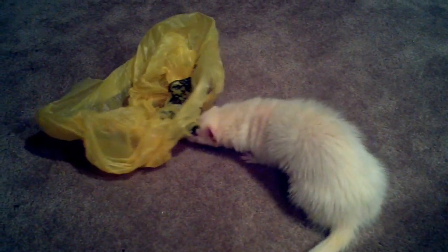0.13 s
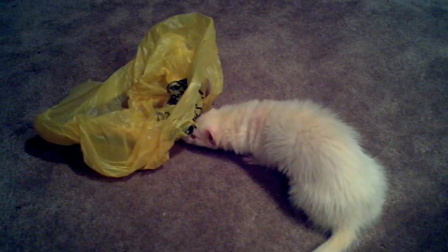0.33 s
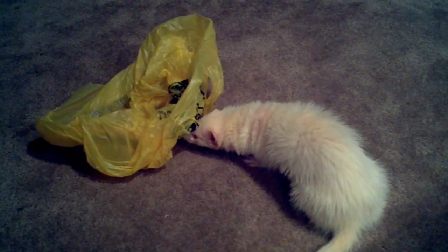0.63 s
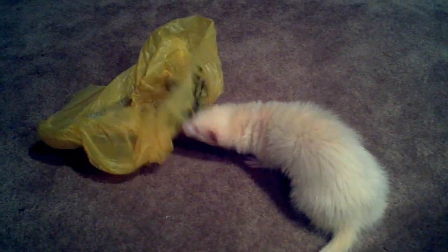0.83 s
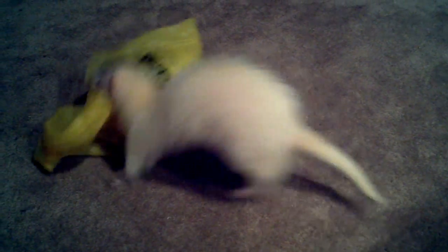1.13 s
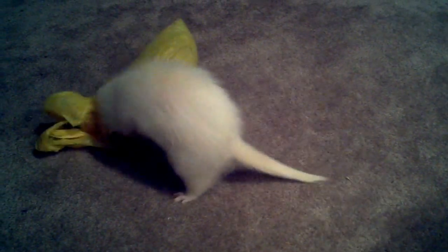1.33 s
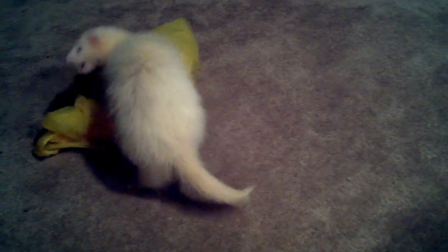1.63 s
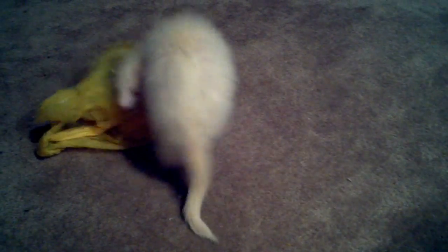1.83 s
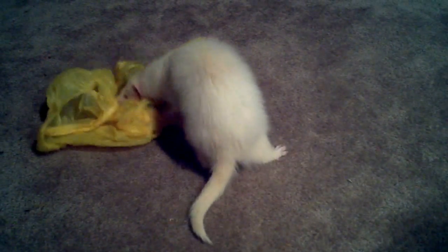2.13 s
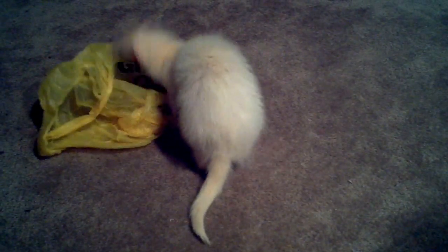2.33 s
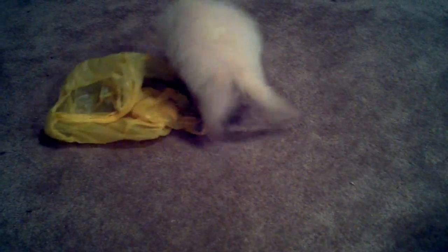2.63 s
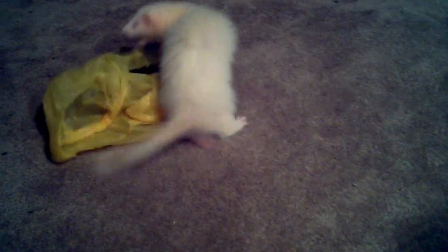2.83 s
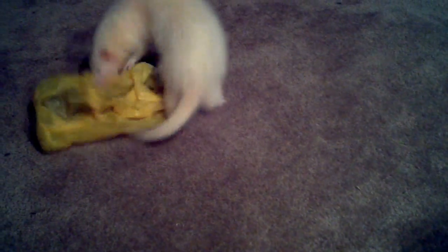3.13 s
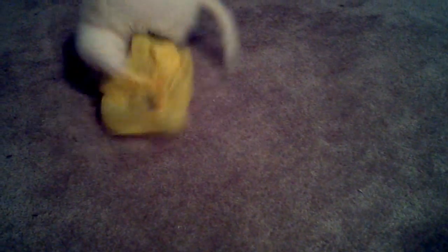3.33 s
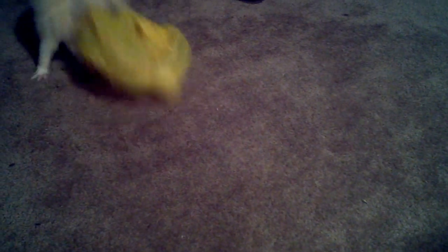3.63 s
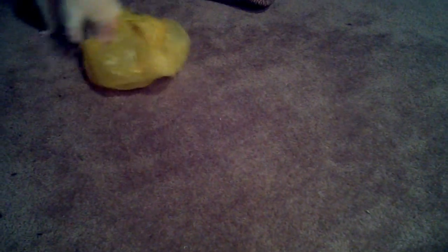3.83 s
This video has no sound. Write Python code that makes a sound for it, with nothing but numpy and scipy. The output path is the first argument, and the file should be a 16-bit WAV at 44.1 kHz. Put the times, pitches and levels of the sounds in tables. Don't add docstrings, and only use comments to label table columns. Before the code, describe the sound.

A thin plastic bag crackles and rustles in growing bursts as a small animal drags it

```python
import sys
import numpy as np
from scipy import signal
from scipy.fft import rfft, irfft, next_fast_len
from scipy.io import wavfile
from scipy.ndimage import map_coordinates

SR = 44100
rng = np.random.default_rng(int(sys.argv[2]) if len(sys.argv) > 2 else 0)


def gain_from_db(level_db):
    decades = np.asarray(level_db, float) / 20
    return 10 ** decades


def wav_out(sig):
    wavfile.write(sys.argv[1], SR, np.round(np.clip(np.atleast_2d(sig).T, -1, 1) * 32767).astype(np.int16))


N = 176400

# peak t/s, peak level/dB, rise/s, fall/s (to half power)
CRUMPLE_SURGES = [(.027, -57.5, 0.057, 0.076), (.197, -57.5, 0.038, 0.054), (.333, -60, 0.023, 0.031),
                  (.43, -66.5, 0.062, 0.035), (1.015, -54.5, 0.026, 0.04), (1.084, -45.5, 0.023, 0.037),
                  (1.21, -49.5, 0.027, .03), (1.275, -48.5, 0.042, .03), (1.34, -44, 0.039, 0.065),
                  (1.43, -44, 0.039, 0.09), (1.605, -41.5, 0.063, 0.076), (1.757, -44, 0.022, 0.082),
                  (2.05, -40.5, 0.042, 0.037), (2.14, -45, 0.023, 0.02), (2.266, -44.5, 0.057, 0.046),
                  (2.37, -45, 0.041, 0.019), (2.481, -49.5, 0.053, 0.051), (2.585, -45, 0.022, 0.043),
                  (2.768, -38.5, 0.045, 0.025), (2.873, -43.5, 0.055, 0.041), (2.999, -36, 0.036, 0.054),
                  (3.1, -44.5, .03, 0.15), (3.305, -39.5, 0.038, .04), (3.375, -38, 0.04, 0.045),
                  (3.522, -33, 0.054, .03), (3.59, -35, 0.024, 0.037), (3.72, -37, 0.044, 0.038),
                  (3.803, -34.5, 0.043, 0.025), (3.918, -32.5, 0.049, .045)]
# f/Hz, spectral level/dB per Hz
FILM_SPECTRUM = [(150, -22.5), (1000, -43.5), (1900, -23), (2500, -4), (5600, -6.5), (7600, -1.5),
                 (10500, -9), (15500, -8.5)]


def film():
    gain = swell(CRUMPLE_SURGES)
    flips_per_s = 18000 * (gain / gain_from_db(-40)) ** 0.28
    flips = clicks(flips_per_s) * gain_from_db(0.27 * drift(90))
    pitches_hz = np.geomspace(150, 17000, 48)
    dealt = rng.choice(len(pitches_hz), N, p=pitches_hz / pitches_hz.sum())
    crackle = np.zeros(N)
    for k, hz in enumerate(pitches_hz):
        ringing = unit(ring(flips * (dealt == k), hz, t60=14 / hz))
        band_level = gain_from_db(at_hz(FILM_SPECTRUM, hz) + 0.91 * drift(20))
        crackle += band_level * np.sqrt(hz) * ringing
    return gain * unit(crackle)


def swell(rows):
    t = np.arange(0, N, 32) / SR
    power = 1e-12
    for peak_s, db, rise, fall in rows:
        half_time = np.where(t < peak_s, rise, fall)
        shape = np.abs((t - peak_s) / half_time) ** 1.9
        power = power + gain_from_db(db) ** 2 * 0.5 ** shape
    return np.interp(np.arange(N) / SR, t, np.sqrt(power))


def clicks(per_s):
    signs = rng.choice([-1, 1], N)
    chance = np.clip(per_s / SR, 1e-3, 1)
    return signs * (rng.random(N) < chance) / np.sqrt(chance)


# t/s, peak level/dB, f/Hz
FILM_SNAPS = [(.1331, -55, 8100), (.17, -55, 6850), (.6022, -56.5, 6600), (.6022, -52, 4370),
              (.9095, -63.5, 7100), (1.2715, -41, 7600), (2.2656, -39, 6560), (2.359, -43, 6460),
              (2.9442, -43, 6900), (2.993, -29.5, 6900), (3.27, -33, 7600)]
# t/s, peak level/dB, f/Hz
CREASE_PING = [
    (.6026, -46, 5050),
]


def snaps():
    return blows(FILM_SNAPS, t60=0.003, soft_hz=9000) + blows(CREASE_PING, t60=0.008, soft_hz=9000)


# peak t/s, peak level/dB, rise/s, fall/s (to half power)
FOLD_PRESSES = [
    (.33, -72, 0.037, .03),
    (1.35, -56, 0.033, 0.022),
    (2.04, -55, .03, 0.015),
    (3.0, -76, 0.017, 0.027),
    (3.5, -80, .05, .06),
    (3.92, -92, 0.035, 0.033),
]


def presses():
    band = signal.butter(2, [250, 1780], "band", fs=SR, output="sos")
    crumple = signal.sosfilt(band, clicks(np.full(N, 5400)))
    return swell(FOLD_PRESSES) * unit(crumple)


# t/s, peak level/dB, f/Hz
PAW_LANDINGS = [(1.108, -65, 119), (1.2245, -51, 130), (1.333, -54, 326), (1.3305, -45, 115),
                (1.588, -65, 120), (1.835, -52, 120), (2.022, -54, 285), (2.131, -54, 122),
                (2.363, -62, 129), (3.033, -53, 119), (3.401, -59, 119), (3.688, -49, 109),
                (3.828, -58, 124)]


def paws():
    return blows(PAW_LANDINGS, t60=0.039, soft_hz=300)


def blows(rows, t60, soft_hz):
    out = np.zeros(N)
    r = np.exp(-2 * np.pi * soft_hz / SR)
    tick = np.eye(1, 4000)[0]
    contact = signal.lfilter([1], [1, -2 * r, r * r], tick)
    for s, db, hz in rows:
        one = ring(ring(contact, hz, t60), hz, t60)
        i = int(s * SR)
        out[i:i + 4000] += (gain_from_db(db) * one / np.abs(one).max())[:N - i]
    return out


def room(x):
    t60, dull_hz = 0.26, 4400 * 4
    size = next_fast_len(N + SR)
    w = 2 * np.pi * np.arange(size // 2 + 1) / size
    dull = 1 / (1 + 1j * w * SR / (2 * np.pi * dull_hz))
    echo = 0
    for k, lag in enumerate(rng.uniform(0.006, 0.04, 10) * SR):
        loop = gain_from_db(-60 * lag / SR / t60) * dull * np.exp(-1j * w * int(lag))
        echo = echo + (-1) ** k * loop / (1 - loop)
    return irfft(rfft(x, size) * echo, size)[:N] / 3


# f/Hz, spectral level/dB per Hz
FLOOR_SPECTRUM = [(30, -30), (110, 4.5), (220, -2), (400, -2.5), (900, -14.5), (1800, -11), (5200, -19),
                  (15000, -19)]


def room_tone():
    hz = np.arange(N // 2 + 1) * SR / N
    noise = irfft(rfft(rng.standard_normal(N)) * gain_from_db(at_hz(FLOOR_SPECTRUM, hz)), N)
    return gain_from_db(-63.5) * unit(noise)


# f/Hz, rms level/dB, line width/Hz, left minus right/dB
WHINE_LINES = [(514.5, -75, 0.37, 9.5), (221.3, -83.5, 4.15, 7)]


def whine():
    out = np.zeros((2, N))
    for hz, db, width_hz, pan_db in WHINE_LINES:
        phase = 2 * np.pi * np.cumsum(hz + width_hz * drift(6.9)) / SR
        tone = gain_from_db(db + drift(1.7)) * np.sqrt(2) * np.sin(phase)
        out += tone * gain_from_db(np.array([[pan_db / 2], [-pan_db / 2]]))
    return out


def unit(x):
    return x / np.sqrt(np.mean(x ** 2) + 1e-20)


def at_hz(points, hz):
    p = np.array(points)
    return np.interp(np.log(np.maximum(hz, 1)), np.log(p[:, 0]), p[:, 1])


def drift(rate):
    r = np.exp(-80 * np.pi * rate / SR)
    noise = rng.standard_normal(N // 40 + 2002)
    slow = signal.lfilter([1], [1, -2 * r, r * r], noise)[2000:]
    return np.interp(np.arange(N) / 40, np.arange(len(slow)), unit(slow))


def ring(x, hz, t60):
    r = gain_from_db(-60 / (t60 * SR))
    w = 2 * np.pi * hz / SR
    return signal.lfilter([0, np.sin(w)], [1, -2 * r * np.cos(w), r * r], x + 1e-18)


def scene():
    near = film() + presses() - paws()
    near = signal.sosfilt(signal.butter(4, 89, "high", fs=SR, output="sos"), near)
    sharp = snaps()
    mono = near + sharp + gain_from_db(-8) * room(near + 0.24 * sharp) + room_tone()
    return np.array([mono, mono])


def slip(x):
    spread_rad, step_s, step_hz = 1.3, 0.006, 700
    hz, t, z = signal.stft(x, SR, nperseg=384, noverlap=320)
    grid = np.meshgrid(hz / step_hz, t / step_s, indexing="ij")
    turn = map_coordinates(rng.standard_normal((40, 900)), grid, order=1)
    z = z * np.exp(1j * spread_rad * turn / turn.std())
    return signal.istft(z, SR, nperseg=384, noverlap=320)[1][:len(x)]


def low_pass(x):
    return signal.sosfilt(signal.butter(12, 16060, fs=SR, output="sos"), x)


# f/Hz, level/dB
SUM_WEIGHT = [(30, 12), (85, 4.5), (200, 9), (450, 3.5), (750, 3), (1400, -0.5), (2600, -4.5), (3400, 1)]


def record(dry):
    edge, lag = 2000, 15
    x = np.pad(dry[0], edge, "reflect")
    hz = np.arange(len(x) // 2 + 1) * SR / len(x)
    audible = hz < 15760
    presence = 1 / (1 + (5950 / (hz + 1)) ** 30) / (1 + (hz / 8200) ** 12)
    x = irfft(rfft(x) * gain_from_db(5.5 * presence) * audible, len(x))
    slipped = irfft(rfft(slip(x)) * gain_from_db(at_hz(SUM_WEIGHT, hz)) * audible, len(x))
    mid = (np.roll(slipped, lag) - slipped) / 2
    side = (np.roll(x, lag) + x) / 2
    stereo = np.array([mid + side, mid - side])[:, edge:-edge]
    return low_pass(stereo + whine())


dry = scene()
out = record(dry)
wav_out(out)
```